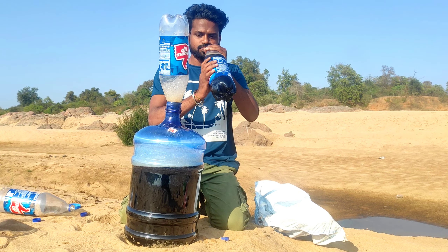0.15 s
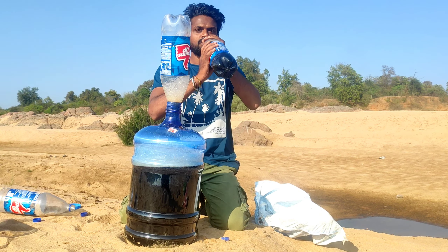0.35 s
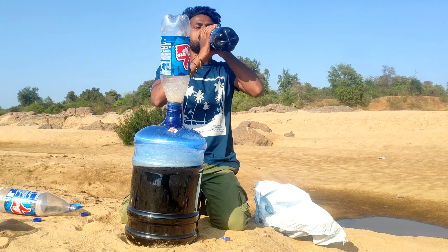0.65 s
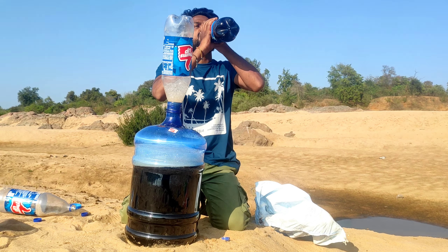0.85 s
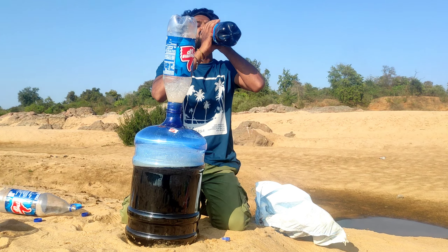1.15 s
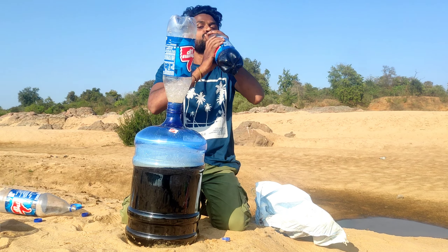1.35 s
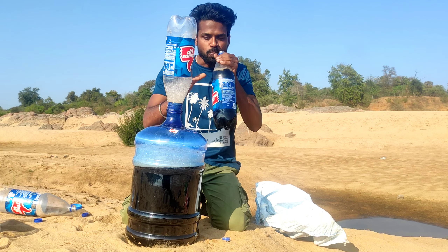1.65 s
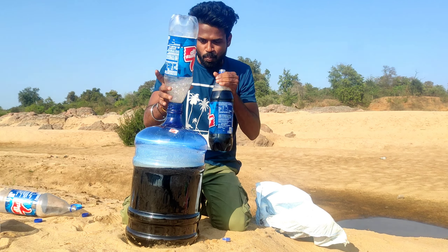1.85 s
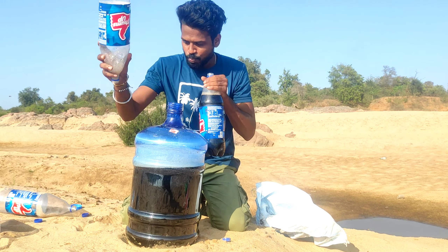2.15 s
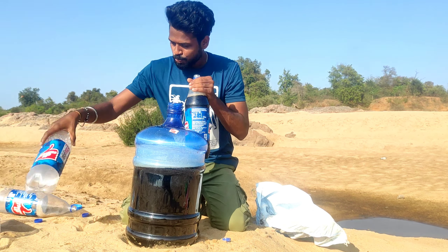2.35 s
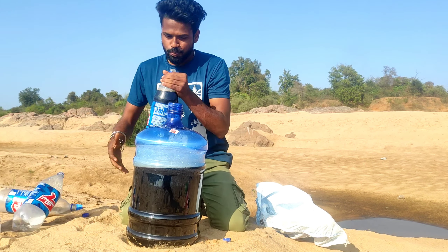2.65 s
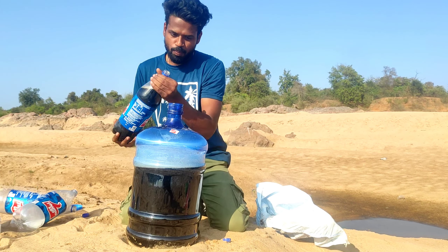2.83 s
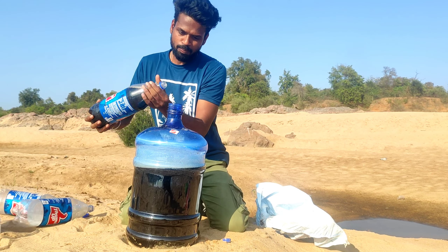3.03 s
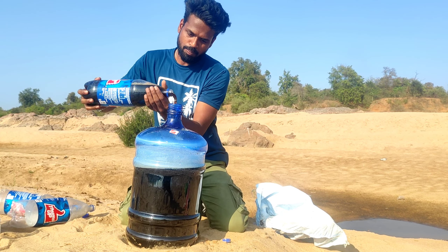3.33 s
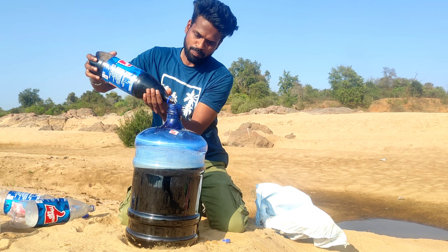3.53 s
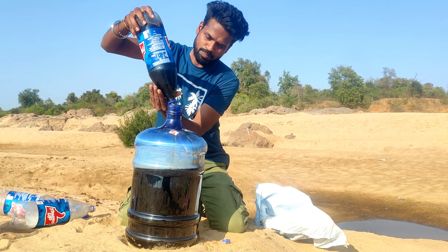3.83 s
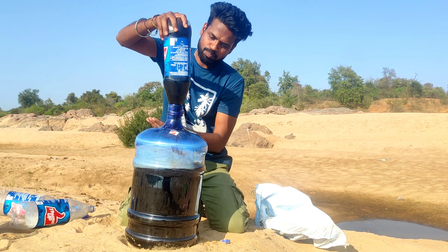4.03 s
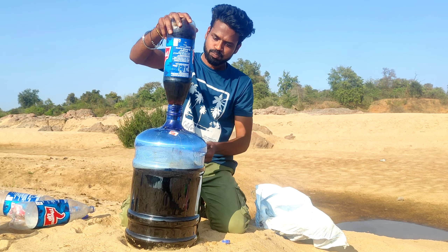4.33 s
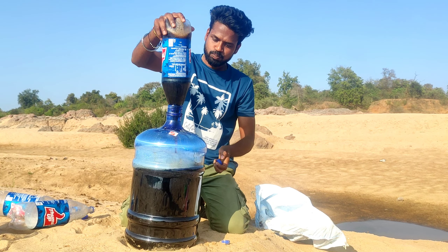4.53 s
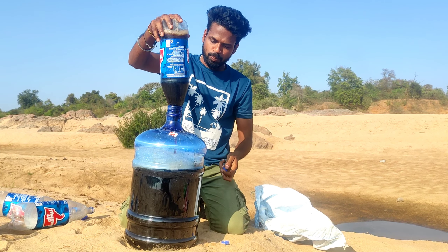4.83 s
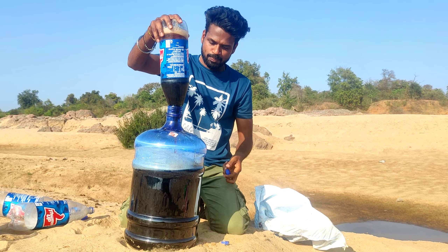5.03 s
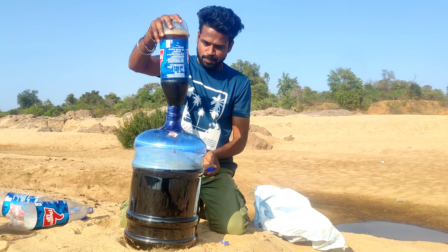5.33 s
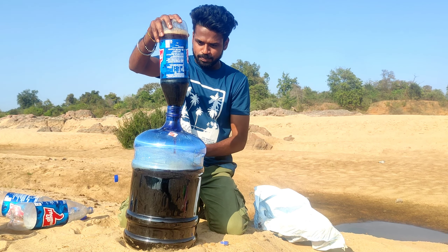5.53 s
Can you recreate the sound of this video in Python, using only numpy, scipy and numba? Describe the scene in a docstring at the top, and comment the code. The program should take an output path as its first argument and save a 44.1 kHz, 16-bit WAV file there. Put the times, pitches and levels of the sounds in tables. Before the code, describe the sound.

A sharp, hollow crack of an empty plastic bottle being pulled free breaks a quiet open-air hiss with wind buffeting the microphone. The bottle clatters lightly onto others. Then a full one knocks against a big plastic can nearby and seats with a strong hollow thud, followed by soft, uneven glugs and a faint fizz. Tiny distant birds chirp early on and again near the end.

```python
"""Outdoors on sand: an empty plastic bottle is pulled off the neck of a big plastic can and tossed on a
heap of bottles. A full one is knocked against the can and set into its neck, and the drink glugs down.
Each knock rings the plastic walls and the air inside; each glug is a bubble that rings for a moment.
Wind buffets the two microphone openings; small birds sing far off over a soft open-air hiss."""
import sys
import numpy as np
from scipy import signal
from scipy.io import wavfile
from scipy.ndimage import uniform_filter1d
from numba import njit

SR = 44100
rng = np.random.default_rng(int(sys.argv[2]) if len(sys.argv) > 2 else 0)


def unload_audio(sound):
    """Save the sound as a 16-bit wav file, at the path given as the first command line argument."""
    columns = np.transpose(np.atleast_2d(sound))
    # keep every value between -1 and 1, then stretch to whole-number steps
    steps = np.round(np.clip(columns, -1, 1) * 32767)
    wavfile.write(sys.argv[1], SR, steps.astype(np.int16))


N = 250488


def undb(db):
    """Turns decibels into a factor to multiply by."""
    return 10 ** (np.asarray(db) / 20)


def level(x, db):
    """Scales a sound to an average (rms) level of db."""
    return x * undb(db) / np.sqrt(np.mean(x ** 2))


@njit
def low_and_band(x, hz, damping):
    """A filter with two outputs: what lies below hz, and what lies around it."""
    y, band_state, low_state = np.empty((2, len(x))), 0., 0.
    g = np.tan(np.pi * hz / SR)
    for i in range(len(x)):
        v = (band_state + g * (x[i] - low_state)) / (1 + g * (g + damping))
        y[0, i], y[1, i] = low_state + g * v, damping * v
        band_state, low_state = 2 * v - band_state, low_state + 2 * g * v
    return y


def band(x, hz, width_hz, order=1):
    """Keeps the part of a sound around hz."""
    for _ in range(order):
        x = low_and_band(x, float(min(hz, .4 * SR)), width_hz / hz)[1]
    return x


def wander(rate):
    """A smooth random curve of spread 1 that heads for a new value rate times a second."""
    hold = int(SR / rate)
    steps = np.repeat(rng.standard_normal(N // hold + 1), hold)
    path = uniform_filter1d(uniform_filter1d(steps, hold), hold)[:N]
    return path / np.std(path)


def curve(points):
    """Joins (time_s, value) points with straight lines."""
    return np.interp(np.arange(N) / SR, *np.transpose(points))


def add(out, start_s, x, pan_db=0, lag=0):
    """Mixes x into both channels; the left is pan_db louder and lag samples later."""
    for ch, sign in enumerate((1, -1)):
        i = int(start_s * SR) + (lag if ch == 0 else 0)
        row = np.atleast_2d(x)[-ch]
        out[ch, i:i + len(row)] += row[:N - i] * undb(sign * pan_db / 2)


def fade(t, ring_s):
    """Dies away by 60 dB in ring_s seconds."""
    return np.exp(-np.log(1000) * t / max(ring_s, 1e-3))


def ring(t, hz, ring_s, glide=0):
    """A dying tone that needs a quarter cycle to get going; glide bends it upward."""
    return np.sin(2 * np.pi * hz * (t + glide * t ** 2 / 2)) * fade(t, ring_s) * np.minimum(4 * hz * t, 1)


def clicks(n, per_s, spread_db):
    """Random clicks of very uneven size."""
    sizes = (rng.random(n) < per_s / SR) * undb(spread_db * rng.exponential(size=n))
    return level(sizes * rng.standard_normal(n) + 1e-9, 0)


def open_air():
    """Far hiss, in half-octave bands that swell together and flicker alone."""
    # tone of the hiss that is alike (mid) and opposite (side) in the two channels: pitch_hz, relative_db
    mid = [(47, -30), (80, 1), (424, -8), (539, -11), (613, -9.5), (906, -14.5), (3050, -22), (14200, -35)]
    side = [(47, -29), (80, -11.5), (226, -10), (669, -18), (1310, -21.5), (3050, -27), (14200, -40.5)]
    out = np.zeros((2, N))
    for shape, total_db, signs in (mid, -60, [1, 1]), (side, -61.5, [1, -1]):
        pitches, levels = np.transpose(shape)
        hiss, swell = 0, wander(0.18)
        for hz in 90 * 2 ** np.arange(0, 8, .5):
            db = np.interp(np.log(hz), np.log(pitches), levels) + 0.6 * swell + 1.7 * wander(22)
            treble_lift = max(hz / 10500, 1) ** 1.6
            hiss += undb(db) * band(rng.standard_normal(N), hz, hz / 2, order=2) * treble_lift
        out += np.outer(signs, level(hiss, total_db))
    return out


def wind(rumble_hz=47.2):
    """Wind rumbles on each microphone opening separately; single swirls of air thump one of them."""
    # steady rumble: time_s, level_db
    loudness = [(0, -56.5), (.8, -55), (1.2, -52), (1.55, -47.5), (2.0, -49.5), (2.9, -48), (3.5, -57.5),
                (4.7, -52), (5.68, -59.5)]
    # swirls: middle_s, level_db, channel (0 left, 1 right)
    swirls = [(0.058, -42.5, 0), (0.144, -41.5, 0), (0.928, -39.5, 0), (0.939, -38, 1), (0.968, -37, 1),
              (1.1, -40, 1), (1.298, -32, 0), (1.436, -36.5, 0), (1.49, -42, 0), (1.827, -39, 1),
              (1.87, -34, 0), (1.942, -35, 1), (2.314, -35.5, 0), (2.486, -40, 1), (2.525, -30, 0),
              (2.545, -21, 0), (2.575, -38, 0), (3.33, -47.5, 0), (4.71, -47, 0)]
    out = np.zeros((2, N))
    for ch in range(2):
        gusts = rng.standard_normal(N) * undb(2.5 * wander(20))
        rumble = band(gusts, rumble_hz, 1.3 * rumble_hz)
        out[ch] = low_and_band(rumble, 2.5 * rumble_hz, 1.2)[0]
    out = level(out, 0) * undb(curve(loudness))
    for middle_s, db, ch in swirls:
        length_s = 0.03 * undb(-0.19 * (db + 35))  # stronger swirls are shorter
        span = np.linspace(-1, 1, int(length_s * SR))
        speed, phase = rng.random(2)
        angle = np.pi * rumble_hz * (0.68 + 0.96 * speed) * length_s * span + 2 * np.pi * phase
        swing = np.sin(angle) + 0.19 * np.sin(2 * angle) + 0.23 * np.sin(3 * angle)  # one steep side
        i = int((middle_s - length_s / 2) * SR)
        out[int(ch), i:i + len(span)] += 2 * undb(db) * swing * np.cos(np.pi * span / 2) ** 2
    return out


def chirp(length_s, start_hz, end_hz, db):
    """A sliding whistle whose loudness flutters a little."""
    n = int(length_s * SR)
    flutter = undb(15 * uniform_filter1d(rng.standard_normal(n), size=60))
    whistle = np.sin(2 * np.pi * np.cumsum(np.geomspace(start_hz, end_hz, n)) / SR)
    return undb(db) * whistle * np.hanning(n) ** .5 * flutter


def birds(echo_db=-9, echo_s=.12):
    """One bird repeats its phrase, others drop single notes; bushes smear them with a short echo."""
    # notes of the phrase: delay_s, length_s, start_hz, end_hz, relative_db
    phrase = [(0, .026, 4950, 4300, 2), (.018, .038, 4450, 3750, 5), (.056, .015, 5100, 4600, 3),
              (.071, .02, 5350, 4750, 4), (.089, .022, 5150, 5350, 2), (.108, .026, 5300, 5900, -8)]
    # each time it is sung: start_s, level_db
    repeats = [(.734, -53.5), (1.029, -53.5), (1.320, -56), (3.875, -58), (4.165, -58.5), (4.460, -60),
               (4.765, -58), (5.072, -55.5)]
    # notes of other birds: start_s, length_s, start_hz, end_hz, level_db
    single_notes = [(.20, .02, 4200, 3700, -69), (.38, .02, 2800, 3300, -66), (.415, .018, 3500, 2800, -65),
                    (.41, .025, 7000, 7000, -69), (.44, .04, 7350, 7300, -71), (.535, .06, 7000, 7000, -68),
                    (.61, .04, 4400, 2300, -67), (1.34, .07, 2950, 2750, -67), (4.80, .04, 3100, 3300, -68),
                    (5.055, .045, 3500, 3300, -66), (5.10, .08, 3100, 2750, -66),
                    (5.30, .03, 2900, 3300, -66), (5.335, .03, 3300, 2700, -67)]
    out = np.zeros((2, N))
    for start_s, db in repeats:
        tuning = 1 + 0.007 * rng.standard_normal()
        for delay_s, length_s, start_hz, end_hz, relative_db in phrase:
            note = chirp(length_s, tuning * start_hz, tuning * end_hz, db + relative_db)
            add(out, start_s + delay_s, note, pan_db=-2.5, lag=5)
    for start_s, length_s, start_hz, end_hz, db in single_notes:
        add(out, start_s, chirp(length_s, start_hz, end_hz, db), pan_db=.3, lag=2)
    t = np.arange(SR // 4) / SR
    echo = rng.standard_normal((2, len(t))) * fade(t, echo_s)
    echo *= undb(echo_db) / np.linalg.norm(echo, axis=1, keepdims=True)
    return out + signal.fftconvolve(out, echo, axes=1)[:, :N]


def rubs_and_knock_tails():
    """Short grainy noises: plastic and sand rubbing, and the rattle and low boom that trail the knocks."""
    # grainy noises: start_s, length_s, level_db, pitch_hz
    noises = [(1.69, 0.028, -60, 5950), (1.913, 0.072, -56, 1680), (1.989, 0.047, -53, 2550),
              (2.603, 0.032, -52.5, 4600), (2.753, 0.028, -61, 4800), (2.92, 0.032, -62, 3000),
              (3.393, 0.057, -64.5, 1430), (3.555, 0.038, -55.5, 2450), (4.467, 0.039, -63, 2780),
              (3.597, 0.53, -64.5, 2380), (4.084, 0.066, -69, 1200), (4.089, 0.055, -52, 5150),
              (4.086, 0.081, -34, 170)]
    out = np.zeros((2, N))
    for start_s, length_s, db, hz in noises:
        n = int(length_s * SR)
        grains = band(clicks(n, per_s=9000, spread_db=2.3), hz, 1.5 * hz, order=2)
        add(out, start_s, level(grains, db) * np.hanning(n) ** 0.25, lag=2)
    return out


def knocks(hits, wall_tones, lag, ring_scale, crack_hz, crack_s, crunch, crunch_s):
    """Each blow, and the crunch after it, rings the wall and the air inside; a sharp crack sits on top."""
    out, t = np.zeros((2, N)), np.arange(SR // 4) / SR
    for start_s, blow_db, hardness, air_db, air_hz, crack_db in hits:
        # a harder blow presses on the wall and shortens its ring
        stretch = ring_scale * undb(-0.2583 * (blow_db + 31.5))
        wall = 0
        for k, (hz, db, ring_s) in enumerate(wall_tones):
            spot_db, detune = rng.normal(0, [3.5, .02])  # no two blows sound quite alike
            gain = (-1) ** k * undb(db + hardness * np.log2(hz / 800) + spot_db)
            wall += gain * ring(t, hz * (1 + detune), stretch * ring_s)
        push = crunch * clicks(len(t), per_s=2500, spread_db=3.5) * fade(t, crunch_s)
        push[0] = 1  # the blow itself
        body = .5 * wall - undb(air_db) * ring(t, air_hz, stretch * .11)
        body = signal.fftconvolve(body, push / np.linalg.norm(push))[:len(t)]
        shared, *sides = rng.standard_normal((3, len(t)))
        hiss = np.array([band(shared + 2.53 * own, crack_hz, 1.51 * crack_hz, order=3) for own in sides])
        crack = hiss * fade(t, crack_s) * np.minimum(t / 0.0011, 1)
        add(out, start_s, undb(blow_db) * (body + undb(crack_db) * crack), lag=lag)
    return out


def bottle_knocks():
    """The empty bottle is pulled off and tossed; the pitch of its air follows the grip and the opening."""
    # blows: start_s, level_db, hardness_db_per_octave, air_relative_db, air_hz, crack_relative_db
    hits = [(1.915, -53, -1, 13, 138, -6), (1.937, -28, -3.5, -15, 176, -23),
            (1.983, -11.5, 2, -14.5, 206, -27), (2.018, -28.5, -4, -4.5, 158, -24),
            (2.617, -43.5, -2.5, 2.5, 159, -1.5), (2.675, -28, -3, 1, 227, -10.5),
            (2.686, -34.5, 0, 9.5, 221, -10), (2.880, -40.5, 4, 6, 206, -7),
            (2.971, -29, -9.5, 4, 183, -18), (3.018, -44.5, -3, 4.5, 178, -16),
            (3.056, -52, 2, 6.5, 246, -6)]
    # tones of the bottle's wall: pitch_hz, relative_db, base_ring_s
    wall_tones = [(366, -4, 0.028), (497, -5, 0.069), (560, -3.5, 0.11), (818, 4, 0.036), (940, 0, 0.013),
                  (1188, 3.5, 0.019), (1360, -4, 0.021), (1663, -20.5, 0.18), (1880, -8.5, 0.025),
                  (2300, -10, 0.033), (2850, -13, 0.025), (4270, -8.5, 0.026)]
    return knocks(hits, wall_tones, lag=4, ring_scale=1.0,
                  crack_hz=5200, crack_s=0.026, crunch=0.036, crunch_s=0.064)


def can_knocks():
    """The full bottle bumps the big can and settles into its neck."""
    # blows: start_s, level_db, hardness_db_per_octave, air_relative_db, air_hz, crack_relative_db
    hits = [(3.563, -28.5, 2.5, 15, 152, -19), (3.587, -41.5, 2.5, 8, 288, -9.5),
            (3.670, -52.5, 2, 14, 202, -8), (3.757, -48.5, -0.5, 8.5, 134, 2),
            (3.785, -43.5, 5, 0, 208, -11), (3.843, -63.5, 12.5, -14, 199, 12),
            (3.958, -57, 10.5, -8, 185, 10), (3.993, -33.5, 2, 18.5, 195, -24),
            (4.044, -27.5, -6.5, 11.5, 164, -18), (4.0725, -30, 4, 1, 306, -19),
            (4.0758, -6.5, -4, -2, 280, -26), (4.107, -37, -2, 1, 317, -25),
            (4.134, -28.5, -2.5, 4, 210, -23), (4.149, -45.5, -2, 15, 187, -9)]
    # tones of the can's wall: pitch_hz, relative_db, base_ring_s
    wall_tones = [(134, -9.5, 0.2), (372, -18, 0.021), (532, 1.5, 0.097), (730, -1, 0.047),
                  (855, -4.5, 0.058), (1026, -7, 0.092), (1294, 1.5, 0.059), (1614, -10.5, 0.11),
                  (1787, 2, 0.029), (2856, -19.5, 0.12), (3920, -63, 0.015)]
    return knocks(hits, wall_tones, lag=1, ring_scale=0.55,
                  crack_hz=4600, crack_s=0.03, crunch=0.033, crunch_s=0.082)


def air_pockets(pockets, glide_per_hz=0, splash=0):
    """Pockets of air ring; glide makes small ones rise faster in pitch, splash adds a burst of noise."""
    out, t = np.zeros((2, N)), np.arange(SR // 2) / SR
    for start_s, db, hz, ring_s in pockets:
        noise = band(rng.standard_normal(len(t)), 1.17 * hz, 2.4 * hz, order=2) * np.sqrt(1000 / hz)
        spray = splash * noise * fade(t, ring_s) * np.minimum(t * hz, 1)
        tone = ring(t, hz, ring_s, glide_per_hz * hz)
        add(out, start_s, undb(db) * (spray - tone) * (t < ring_s), lag=1)
    return out


def can_boom():
    """The air in the open can rings with one deep note."""
    # the note: start_s, level_db, pitch_hz, ring_s
    boom = [(3.571, -23.5, 76.6, 0.41)]
    return air_pockets(boom)


def fizz():
    """A swarm of tiny bubbles of many sizes, each ringing for a few cycles."""
    # strength of the fizz: time_s, level_db
    loudness = [(4.15, -59), (4.5, -67), (4.8, -61), (5.3, -90)]
    db = curve([(loudness[0][0] - .05, -90), *loudness, (loudness[-1][0] + 0.047, -90)])
    swarm = sum((500 / hz) ** 1.04 * band(clicks(N, per_s=300, spread_db=2.5), hz, 0.18 * hz, order=2)
                for hz in np.geomspace(300, 7000, num=13))
    return undb(db + wander(47)) * level(swarm, 0)


def glugs(plip_count=12):
    """Bubbles ring as the drink runs down, with random plips in the neck; small ones die sooner."""
    # big glugs and small plips: start_s, level_db, pitch_hz
    bubbles = [(4.205, -32.5, 254), (4.261, -47.5, 1170), (4.311, -33, 307), (4.320, -41.5, 530),
               (4.335, -34.5, 165), (4.372, -52, 576), (4.418, -30, 155), (4.442, -35.5, 178),
               (4.465, -30.5, 142), (4.466, -43.5, 1540), (4.482, -38.5, 476), (4.493, -37.5, 560),
               (4.506, -44, 1680), (4.557, -54, 1190), (4.614, -27.5, 181), (4.640, -38.5, 134),
               (4.674, -48, 590), (4.675, -55, 2420), (4.735, -44, 217), (4.764, -48.5, 533),
               (4.808, -43, 213), (5.018, -43.5, 188), (5.018, -49.5, 730), (5.148, -37, 298)]
    when, strength, pitch = rng.random((plip_count, 3)).T
    plip_s = np.interp(when, (0, 1), (4.42, 4.78))
    plip_db = -50 + 6 * (strength - .5)
    plip_hz = 1160 * 2 ** (.25 * (pitch - .5))
    pockets = [(start_s, db, hz, 0.076 * (hz / 200) ** -0.37)
               for start_s, db, hz in [*bubbles, *zip(plip_s, plip_db, plip_hz)]]
    return air_pockets(pockets, glide_per_hz=0.0064, splash=0.81)


def scene():
    """Adds the outdoor background, the handling of the plastic and the drink."""
    background = open_air() + wind() + birds()
    handling = rubs_and_knock_tails() + bottle_knocks() + can_knocks() + can_boom()
    return background + handling + fizz() + glugs()


def record(dry):
    """The right microphone opening leaks away deep bass; the phone cuts the highest treble."""
    bass_cut = signal.butter(1, 75.6, "high", fs=SR, output="sos")
    treble_cut = signal.ellip(10, .2, 80, 14350, fs=SR, output="sos")
    return signal.sosfilt(treble_cut, [dry[0], signal.sosfilt(bass_cut, dry[1])])


dry = scene()
out = record(dry)
unload_audio(out)
```